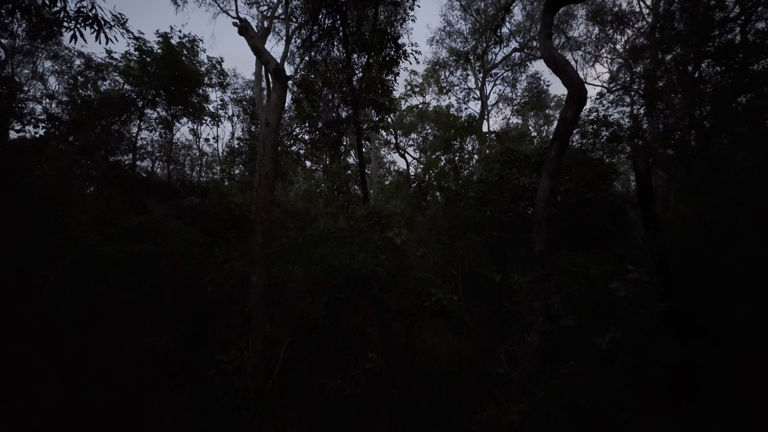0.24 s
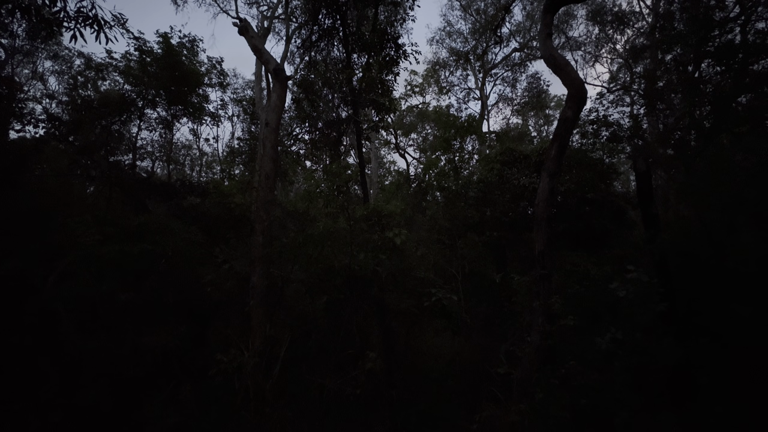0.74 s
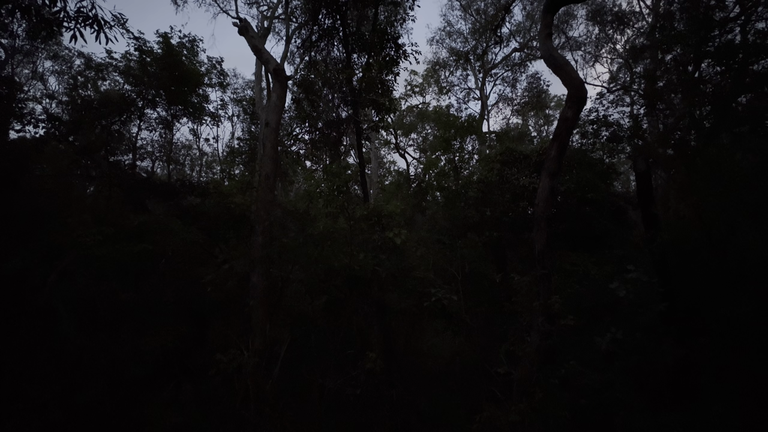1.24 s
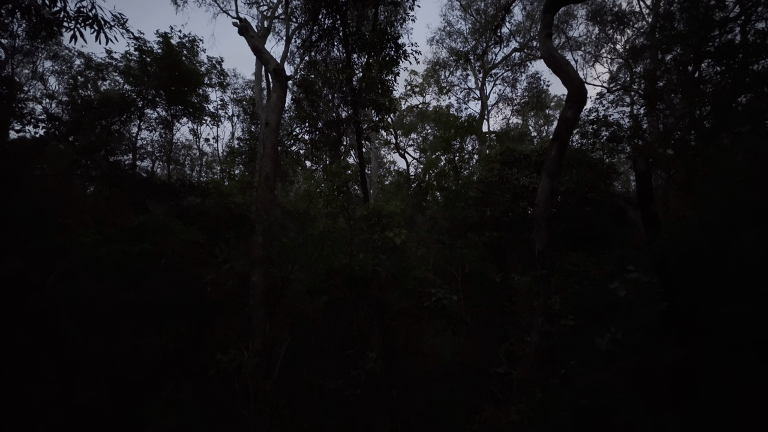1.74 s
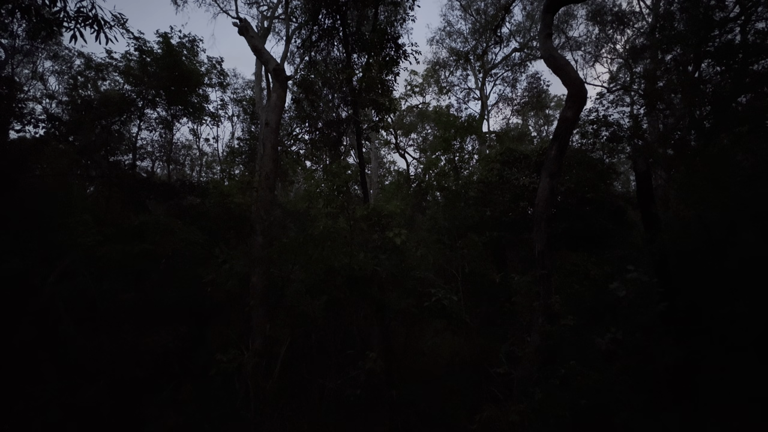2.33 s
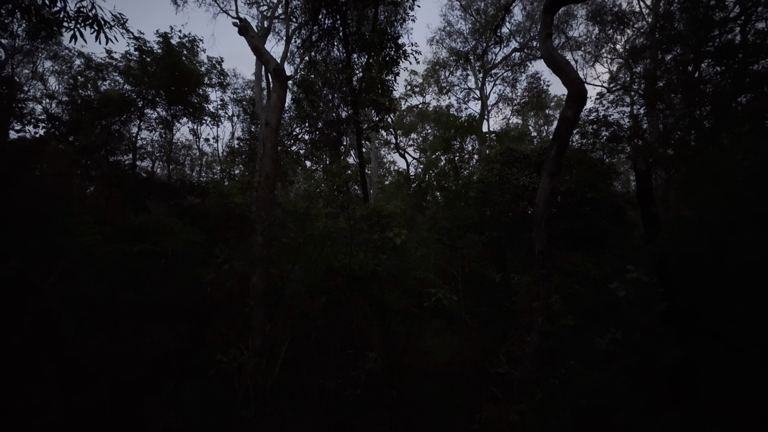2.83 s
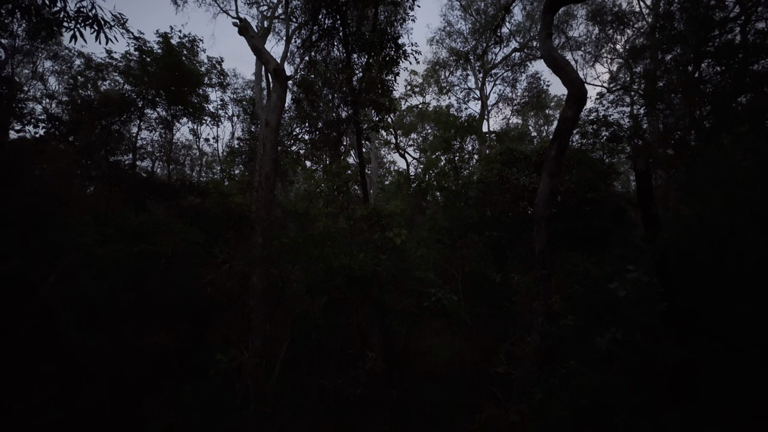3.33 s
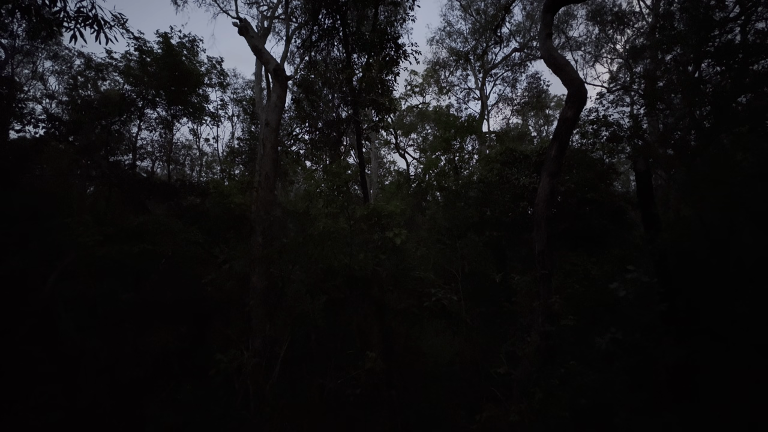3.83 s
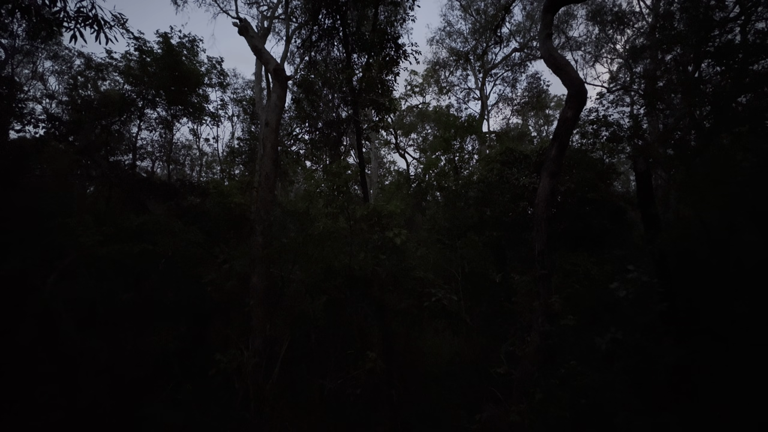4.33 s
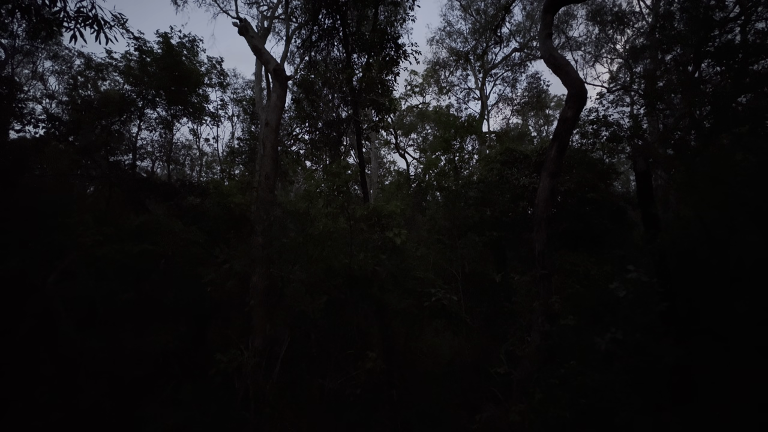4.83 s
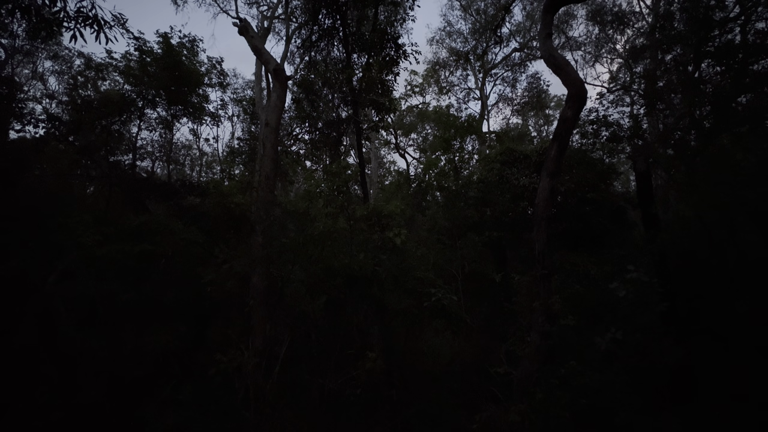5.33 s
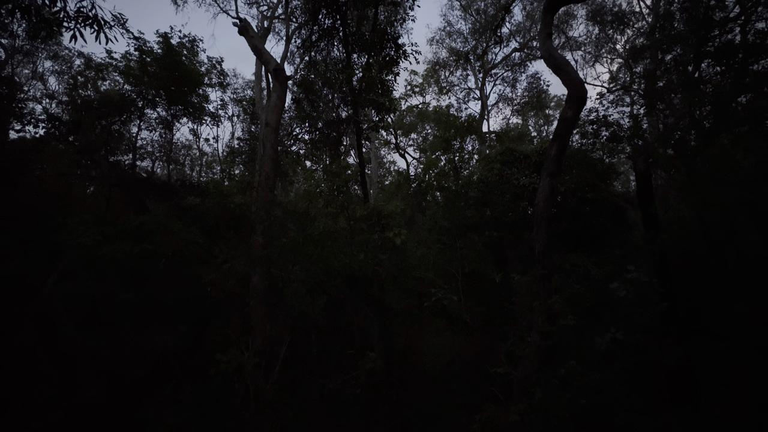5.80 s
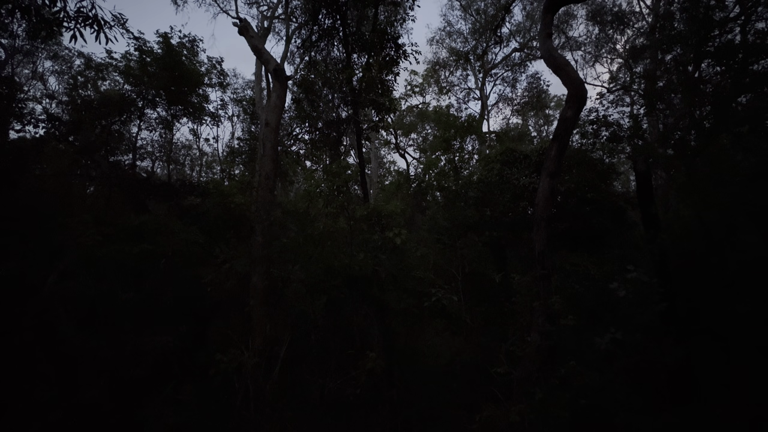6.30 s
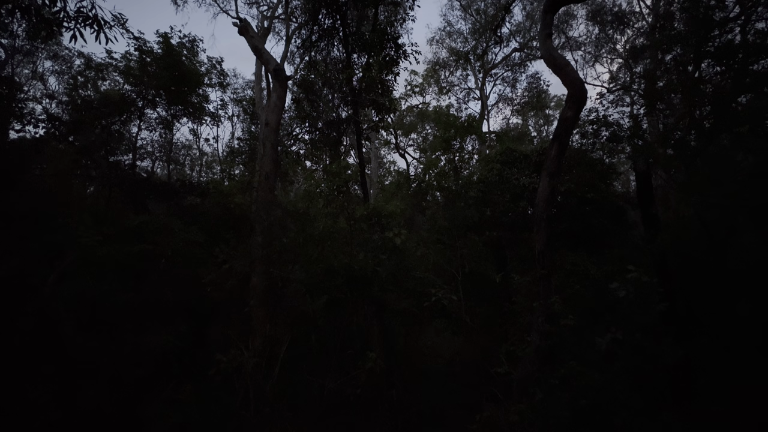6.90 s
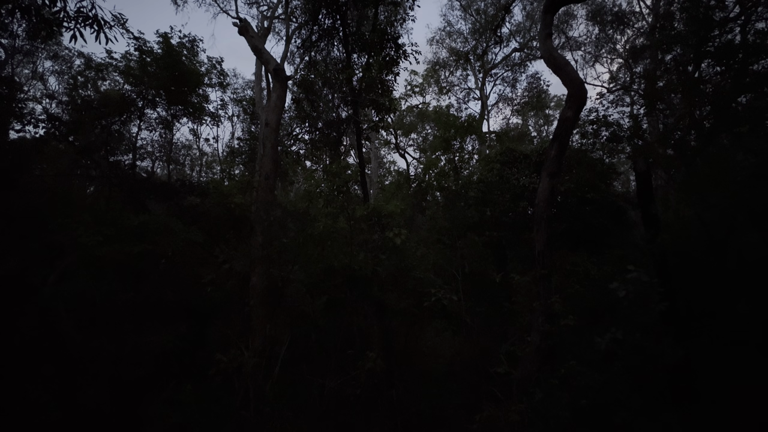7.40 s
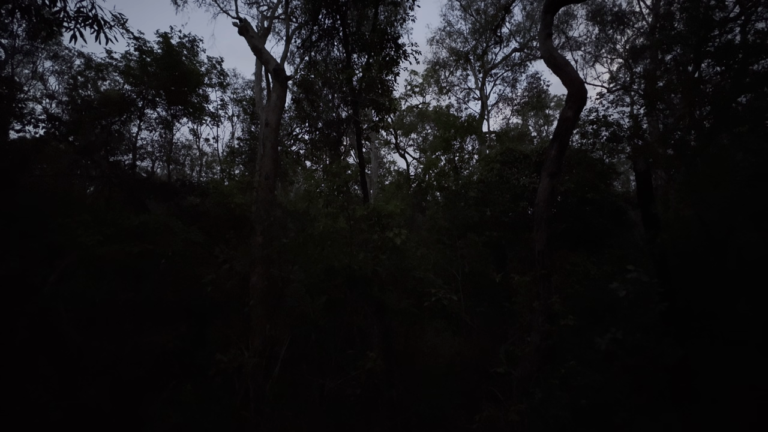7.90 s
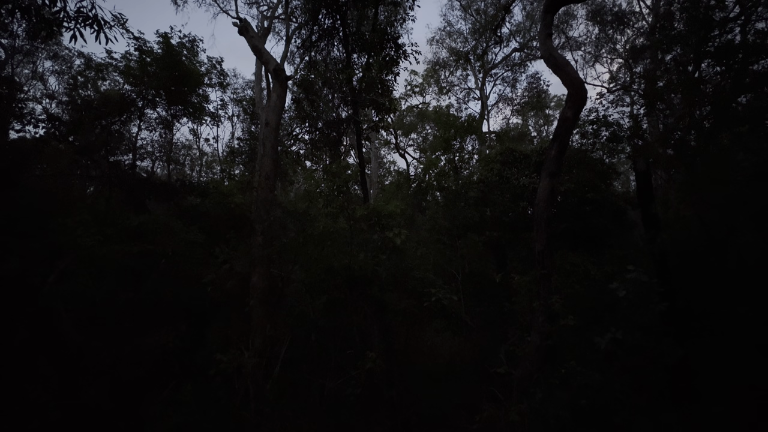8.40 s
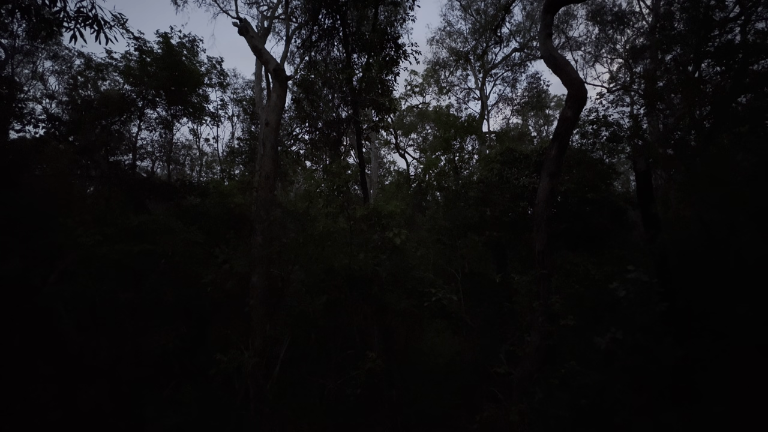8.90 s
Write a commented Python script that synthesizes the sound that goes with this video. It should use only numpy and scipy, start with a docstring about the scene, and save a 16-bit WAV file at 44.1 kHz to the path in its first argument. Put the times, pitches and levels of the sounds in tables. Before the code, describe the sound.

Shrill cicadas fill the woods, a lower one buzzing in quick pulses, with far bird chatter early and four clear crow caws near the end.

```python
"""Forest at dusk

A dense cicada chorus (random short-time spectra) drones to the left under a faint fizz; a lower cicada
(puffed noise through body resonances, with thin wavering tones) buzzes in short phrases. A crow calls, hoarse
at first (puffed noise), then in four clear caws (harmonic partials through a throat). Far birds hoot and yelp
(arched tones) over a faint murmur and rumble (noise). Two spaced ports hear each direction with its own phase."""
import sys
import numpy as np
from scipy import signal
from scipy.fft import rfft, irfft, next_fast_len
from scipy.io import wavfile
from scipy.ndimage import uniform_filter1d

SR = 44100
rng = np.random.default_rng(int(sys.argv[2]) if len(sys.argv) > 2 else 0)


def generate_wav(signal):
    """Clip the signal to [-1, 1] and save it as 16-bit WAV at the path in sys.argv[1]."""
    frames = np.transpose(np.atleast_2d(signal))
    scaled = np.clip(frames, -1, 1) * 32767
    pcm = np.round(scaled).astype(np.int16)
    wavfile.write(sys.argv[1], SR, pcm)


N = 403515

# Every port table says how the right port hears a direction:
# (frequency [Hz], likeness to the left [0-1], phase [rad], left over right [dB]).
# Direction of the buzzing cicada, shared by its buzz and its thin tones; columns as above
BUZZ_PORTS = [(2460, 0.84, -0.8, 4), (3198, 0.83, -3, 1.9), (4270, 0.48, -6, 2.6)]


def chorus():
    """Superposition: countless unrelated singers add up to noise, coloured by their mean spectrum."""
    # mean spectrum of the chorus: (frequency [Hz], relative level [dB])
    chorus_spectrum = [(3800, -15), (4200, -9.5), (4700, -6), (5300, -8), (5950, -6), (6250, -0.5),
                       (6450, 0.5), (6750, -4), (7100, -11.5), (7700, -15), (8300, -17.5), (8800, -23),
                       (9300, -30.5), (9700, -47)]
    # louder single singers and thin spots: (frequency [Hz], width [Hz], level against the chorus [dB])
    singers = [(4090, 120, -4), (4775, 50, 5), (4910, 60, 2.5), (5165, 60, 2.5), (5408, 90, 2.5),
               (5860, 50, 5), (5980, 110, -3.5), (6460, 60, 3), (6920, 60, 3)]
    # direction of the chorus, columns as in every port table
    chorus_ports = [(3660, 0.071, 0, 1.5), (4980, 0.026, 0, 9), (6000, 0.066, 0, 9), (7200, 0.057, 0, 9),
                    (9140, 0.046, 0, 0), (9950, 0.43, 0, -9)]
    arrivals = drone(chorus_spectrum, -32.5, patchy_db=0.0, flicker_db=1.01, peaks=singers)
    return ports(*arrivals, chorus_ports)


def fizz():
    """Superposition again: the faint top of the insects is flickering noise of high frequency."""
    # mean spectrum of the fizz: (frequency [Hz], relative level [dB])
    fizz_spectrum = [(8500, -13), (9600, -35), (10200, 2), (12000, -2.5), (14300, -3), (14800, -20.5),
                     (15200, -15), (16000, -19)]
    # direction of the fizz, columns as in every port table
    fizz_ports = [(8260, 0.43, 0.25, 0), (10260, 0.88, 4.1, 0), (10920, 0.93, 5.7, 0), (12570, 1, 9.3, 0),
                  (13960, .99, 12.2, 0), (16300, 0.97, 13.5, 0)]
    return ports(*drone(fizz_spectrum, -58.5, patchy_db=0.0, flicker_db=1.35), fizz_ports)


def buzzers():
    """Source and resonator: two tymbals buckle in turn, strong and weak, each a puff through the body."""
    # resonances of tymbal and belly: (frequency [Hz], half width at quarter power [Hz], level [dB])
    tymbal = [(2752, 63, -2.5), (2866, 22.5, 2.5), (2930, 47, 0), (3044, 74, 2.5), (3177, 134, 1.5),
              (3210, 104, -1.5), (3484, 96, 0), (3726, 59, 2.5), (3630, 104, 0), (3968, 28, 3)]
    # level of the buzz as it swells in: (time [s], level [dB])
    buzz_level = [(0, -49.5), (.3, -48), (.7, -45.5), (1.7, -44), (3, -44.5), (5, -44), (7, -44),
                  (9.15, -44)]
    puffs_per_s, puff_share = 231, .28  # rate [1/s], four-sigma/2 puff length as a share of the gap
    uneven, steady = .2, .68  # strong-weak step, noise that goes on between the puffs
    turns = np.cumsum(puffs_per_s * (1 + .009 * wander(size=9000) + .01 * wander(size=200))) / SR
    puff = np.exp(-.5 * ((turns % 1 - .5) / (puff_share / 2)) ** 2)
    puff *= 1 + uneven * (-1) ** np.floor(turns)
    drive = (steady + puff) * phrases() * rng.standard_normal(N)

    size = next_fast_len(N)
    hz = np.fft.rfftfreq(size, 1 / SR)
    body = np.sqrt(sum(amp(db) ** 2 / (1 + (hz - f) ** 2 / w ** 2) ** 2 for f, w, db in tymbal))
    body /= 1 + (np.abs(hz - 3350) / 900) ** 8  # the body passes only a band about 3350 Hz
    buzz = curve(buzz_level) * evened(irfft(rfft(drive, size) * body, size)[:N])
    return ports(*among_trees(buzz, t60=.15, wet=.25), BUZZ_PORTS)


def thin_tones():
    """Narrow-band noise: a carrier times a slow complex envelope wavers in pitch and strength."""
    # tones inside the buzz: (frequency [Hz], nominal width [Hz], level against the tone level [dB])
    tones = [(2655, 10, -10), (2860, 10, 1), (3020, 12, -9), (3440, 11, -2), (3652, 9.3, 2.5),
             (3970, 12, 0.5)]
    # common level before the phrase gain: (time [s], level [dB])
    tone_level = [(0, -73), (.7, -61), (3.2, -57.5), (4.3, -51.5), (5.5, -52.5), (7, -57), (9.15, -58.5)]
    t, out = np.arange(N) / SR, np.zeros(N)
    for hz, width_hz, db in tones:
        size = int(SR / (2 * width_hz))
        envelope = wander(size) + 1j * wander(size)
        carrier = np.exp(2j * np.pi * hz * t)
        out += amp(db + 2.2 * wander(size=25000)) * (envelope * carrier).real
    out *= curve(tone_level) * phrases()
    return ports(out, out[::-1], BUZZ_PORTS)  # time-reversed, the tones serve as the unrelated arrival


def phrases():
    """Amplitude modulation: each phrase swells 1.2 dB; its joins bump slightly at first, later break off."""
    # running count of the joins between phrases: (time [s], count)
    joins = [(-.07, 0), (1.516, 12), (2.838, 22), (3.246, 25), (3.791, 29), (4.325, 33), (4.88, 37),
             (5.713, 43), (6.283, 47), (7.147, 53), (7.696, 57), (8.241, 61), (9.226, 68)]
    # gain at the middle of a join: (time [s], gain [dB])
    join_gain = [(0, -3), (2, -4), (3.9, -5), (4.4, -9), (6, -12), (7.3, -9), (9.15, -10)]
    join_s, swell_db = .016, 1.2  # two sigma of a join [s], rise over a phrase [dB]
    t = np.arange(N) / SR
    count = np.interp(t, *np.transpose(joins))
    off_s = (count - np.round(count)) / np.gradient(count * SR)  # time from the nearest join
    join = np.exp(-.5 * (2 * off_s / join_s) ** 2)
    phrase_db = swell_db * (count % 1 - 4.0)  # from -4.8 to -3.6 dB
    return amp(np.interp(t, *np.transpose(join_gain)) * join + phrase_db * (1 - join))


def crow():
    """Source and filter: caws are harmonics through the throat, rasps noise puffed at an unsteady rate."""
    # throat and beak: (frequency [Hz], level [dB])
    throat = [(600, -36), (800, -17.5), (880, -11.5), (980, -4.5), (1130, 0), (1280, -0.5), (1400, -2),
              (1550, -5.5), (1770, 2), (2000, -3.5), (2180, -3), (2400, 3), (2550, -10), (2700, -22),
              (3500, -45)]
    # colour of the rasp: (frequency [Hz], level [dB])
    hoarse = [(600, -27), (850, -8), (1000, -3.5), (1150, 2), (1300, 2.5), (1500, 1.5), (1750, 3.5),
              (1900, -6), (2100, -27), (2400, -8), (2800, -21), (4000, -74)]
    # pitch of each clear caw, one list a caw: (time [s], pitch [Hz])
    caw_pitch = [
        [(5.6, 233.5), (5.65, 242), (5.745, 257.8), (5.84, 255.2), (5.9, 249.5), (5.95, 244), (6.0, 244.7),
         (6.098, 219.8), (6.17, 209.6)],
        [(6.52, 223.7), (6.594, 233.4), (6.674, 232.5), (6.76, 236), (6.84, 237.5), (6.93, 243), (6.968, 225.1),
         (7.14, 220.7), (7.21, 200)],
        [(7.56, 216.3), (7.62, 224.3), (7.70, 229.5), (7.78, 238), (7.84, 238), (7.875, 227.8), (7.94, 222),
         (8.0, 230.3), (8.064, 220.7), (8.12, 210), (8.19, 192.3)],
        [(8.55, 193.2), (8.604, 201.5), (8.636, 215.5), (8.668, 211), (8.694, 224.5), (8.756, 227),
         (8.87, 216.6), (8.96, 220.5), (9.01, 213), (9.2, 209)],
    ]
    # top level of each clear caw: [dB]
    caw_db = [-46, -45.5, -45.5, -45.5]
    # spectral tilt of each clear caw: (at its start [dB per partial], at its end [dB per partial])
    caw_tilt = [(-.2, -0.59), (-.1, -0.013), (0.1, -.4), (-0.36, -0.13)]
    # hoarse, pitchless calls: (start [s], end [s], top level [dB])
    rasps = [(-.2, 0.512, -60), (0.44, 1.048, -58.5), (1.097, 1.757, -66), (1.722, 2.85, -57),
             (3.21, 3.974, -59), (4.258, 5.097, -55)]
    # direction of the crow, columns as in every port table
    crow_ports = [(600, .7, -2.3, 3), (1100, .75, -2, 4), (1500, .74, -2.3, 3), (1750, .88, -2.4, 0),
                  (1950, .95, -2.9, -1), (2400, .95, -3.15, 0)]
    open_s, open_db, top_share, sag_db, shut_s = 0.054, -6.5, 0.64, -5, 0.045  # shape of a caw
    rasp_start_db, rasp_top_share, rasp_sag_db, rasp_edge_s = -8, 0.44, 0, 0.048  # shape of a rasp
    # a caw begins as a rasp, which drops back once the voice catches; levels against the caw's top
    lead_s, catch_s, lead_db, under_db = 0.17, 0.036, -11, -23.5

    t, out = np.arange(N) / SR, np.zeros(N)
    rasp = amp(-67.5 + 3 * wander(size=3000))  # wavering floor
    for rows, top_db, tilt_db in zip(caw_pitch, caw_db, caw_tilt):
        s, hz = np.transpose(rows)
        part = slice(int(s[0] * SR), min(int(s[-1] * SR), N))
        size = part.stop - part.start
        jitter = 0.0062 * wander(size=180, count=size) + 0.00503 * wander(size=900, count=size)
        pitch = uniform_filter1d(np.interp(t[part], s, hz), size=500) * (1 + jitter)
        turns = np.cumsum(pitch) / SR
        tilt = np.linspace(*tilt_db, size)
        folds = np.zeros(size)
        for k in range(3, 14):
            # each partial flutters on its own through the moving air and leaves
            partial_db = 1.3 * wander(size=1100, count=size) + (k - 7) * tilt
            folds += amp(partial_db) * np.cos(2 * np.pi * k * turns)
        level = amp(top_db) * swell(s[0], s[-1], open_db, top_share, sag_db, open_s, shut_s)
        out[part] += evened(coloured(folds, throat)) * level[part]
        lead = amp(top_db + lead_db) * swell(s[0] - lead_s, s[0] + 2 * catch_s, rasp_start_db,
                                             rasp_top_share, 0, rasp_edge_s, catch_s)
        rasp = np.hypot(rasp, np.hypot(lead, amp(under_db) * level))  # powers add
    for start, end, db in rasps:
        call = swell(start, end, rasp_start_db, rasp_top_share, rasp_sag_db, rasp_edge_s, rasp_edge_s)
        rasp = np.hypot(rasp, amp(db) * call)

    turns = np.cumsum(90 * (1 + 0.29 * wander(size=1500))) / SR  # about 90 puffs a second
    puffs = (2.0 + np.exp(-(turns % 1) / 0.11)) * rng.standard_normal(N)
    out += rasp * evened(coloured(puffs, hoarse))
    return ports(*among_trees(out, t60=.35, wet=.3), crow_ports)


def swell(start, end, start_db, top_share, sag_db, rise_s, fall_s):
    """Envelope of one call: it opens, swells to 0 dB, sags and shuts."""
    t = np.arange(N) / SR
    body_db = np.interp(t, [start, start + top_share * (end - start), end], [start_db, 0, sag_db])
    return amp(body_db) * np.clip((t - start) / rise_s, 0, 1) * np.clip((end - t) / fall_s, 0, 1)


def cackle():
    """Multiple scattering: far hoots, yelps and chatter are blurred by echoes among the trees."""
    # low hoots: (middle [s], level [dB], pitch [Hz])
    low_hoots = [(0.064, -60, 696), (0.246, -67, 674), (0.348, -66, 699), (0.55, -73, 584),
                 (0.714, -68, 690), (0.854, -64, 668), (0.974, -63, 660), (1.098, -59.5, 690),
                 (1.242, -64, 692), (1.384, -66, 690), (1.51, -63, 720), (1.658, -66, 706),
                 (2.154, -68, 641), (2.24, -65, 656), (2.32, -62, 655), (2.674, -71, 533), (3.17, -70, 646),
                 (3.29, -66, 650), (3.456, -61, 650), (3.606, -63, 687), (3.724, -61.5, 688),
                 (4.05, -72, 580), (4.154, -68, 630), (4.268, -71, 560), (4.354, -66, 663),
                 (4.54, -65, 700), (5.36, -66, 615), (5.474, -62, 628), (5.584, -61, 618),
                 (5.682, -65, 582), (5.81, -63, 583), (6.79, -69, 673), (6.93, -68, 650), (6.964, -68, 594),
                 (7.04, -66, 580), (7.14, -65, 609), (7.77, -75, 518), (8.05, -71, 607), (8.158, -69, 610),
                 (8.264, -69, 614), (8.378, -66.5, 605), (8.488, -67, 582), (8.594, -65, 582),
                 (8.72, -70, 542), (8.98, -78, 667)]
    # notes that stand out: (middle [s], level [dB], pitch [Hz], length [s], droop [share of pitch])
    clear_yelps = [(.074, -53.5, 1217, 0.08, 0.07), (.21, -54.5, 1164, .11, 0.017),
                   (.378, -62, 1244, 0.095, .02), (.56, -54, 1175, 0.1, 0.065),
                   (.726, -55, 1475, 0.08, 0.025), (.83, -64, 1110, 0.074, .01),
                   (1.008, -58, 1340, 0.1, 0.074), (1.114, -52, 1410, .06, .02),
                   (1.255, -60.5, 1197, 0.14, .13), (1.39, -68, 1115, 0.071, .02),
                   (1.514, -62, 1470, .1, 0.0098), (1.65, -56.5, 1486, .09, 0.075),
                   (1.84, -60, 1140, 0.08, .05), (2.02, -57.5, 702, 0.18, .12),
                   (2.164, -60, 1222, 0.08, 0.036), (2.69, -57, 1147, .09, 0.054),
                   (2.814, -63, 1136, 0.084, .02), (3.03, -57, 1147, 0.088, 0.072),
                   (3.36, -60, 1145, .5, 0.015), (3.545, -55.5, 1100, 0.087, 0.11),
                   (3.74, -55, 1022, 0.08, 0.022), (3.876, -57.5, 1130, 0.076, 0.036),
                   (4.26, -58.5, 1125, 0.12, 0.014), (4.43, -64, 1160, 0.059, .02),
                   (4.82, -57, 1110, .08, 0.023), (4.96, -59, 1090, 0.084, 0.022),
                   (5.03, -58.5, 1225, 0.17, 0.018), (5.15, -63, 1120, 0.074, .03),
                   (6.225, -61, 922, 0.065, .05), (6.46, -71, 1170, .1, .01),
                   (6.71, -62.5, 694, 0.096, 0.13), (8.95, -60, 880, 0.061, .03)]
    # faint random notes, a high and a low voice:
    # (rate [1/s], mean level [dB], lowest pitch [Hz], highest pitch [Hz], last start [s])
    voices = [(14, -65, 950, 1800, 5.3), (12, -74, 540, 720, 9.1)]
    # direction of the far birds, columns as in every port table
    cackle_ports = [(500, .62, -2.2, 3), (1100, .72, -3, 2), (1900, .6, -4, 1)]
    # every hoot lasts .07 s and droops by .1
    hoots = notes([(*row, .07, .1) for row in low_hoots], overtone_db=-10, husk=.6)
    yelp_rows = [*clear_yelps, *chatter(*voices[0]), *chatter(*voices[1])]
    yelps = notes(yelp_rows, overtone_db=-25, husk=.5)
    return ports(*among_trees(hoots + yelps, t60=.5, wet=.52), cackle_ports)


def notes(rows, overtone_db, husk):
    """Frequency modulation: short tones arch up and then fall, with one overtone and husky loudness."""
    out = np.zeros(N + SR)
    for s, db, hz, length, droop in rows:
        u = np.linspace(-1, 1, int(length * SR))
        phase = 2 * np.pi * np.cumsum(hz * (1 - droop * (u + 0.513) ** 2)) / SR  # highest at u = -0.513
        tone = np.sin(phase) + amp(overtone_db) * np.sin(2 * phase)
        at = max(int(s * SR) - len(u) // 2, 0)
        out[at:at + len(u)] += np.sqrt(2) * amp(db) * tone * np.hanning(len(u)) ** 0.81
    return out[:N] * (1 + husk * wander(size=120))


def chatter(per_s, db, low_hz, high_hz, end_s):
    """Random point process: rows of faint notes at chance times, with pitches spread evenly in octaves."""
    when, size, pitch, length, fall = rng.random((int(per_s * end_s), 5)).T
    level_db = db + 3 * (2 * size - 1)
    hz = low_hz * (high_hz / low_hz) ** pitch
    return np.transpose([when * end_s, level_db, hz, .05 + .07 * length, .08 * fall])


def air():
    """Ambient noise: a coloured forest murmur whose part below 130 Hz swells slowly as a rumble."""
    # spectrum of rumble and far murmur: (frequency [Hz], relative level [dB])
    murmur = [(15, -31), (40, -4.5), (65, 2.5), (110, -7), (200, -15), (370, -17), (550, -16.5), (780, -17),
              (1000, -2), (1200, -15), (1800, -3.5), (2100, -0.5), (2500, 4), (3000, 3), (4000, -6),
              (5000, -41)]
    # swell of the rumble: (time [s], relative level [dB])
    rumble = [(0, -73.5), (.85, -79.5), (1.4, -71.5), (1.81, -77), (2.04, -71), (2.6, -76), (3.15, -71),
              (3.85, -70.5), (4.46, -74), (5.3, -74), (6.9, -78), (9.15, -79)]
    # direction of the murmur, columns as in every port table
    air_ports = [(30, 1, 0.1, -4), (79.5, 0.91, 0.44, -1), (200, 0.44, 1, -0.5), (408, 0.12, -0.5, 1),
                 (567, 0.64, -1.5, 5), (1400, 0.96, -4, 1.5), (1840, 0.046, 5.5, 0.5),
                 (2880, 0.68, -1, 4.5)]
    both = np.array(drone(murmur, -55.5, patchy_db=1.1, flicker_db=.3))
    low = signal.sosfiltfilt(signal.butter(2, 130, fs=SR, output="sos"), both)
    return ports(*(both + low * (evened(curve(rumble)) - 1)), air_ports)


def drone(spectrum, db, patchy_db, flicker_db, peaks=()):
    """Random-phase synthesis: chance short-time spectra with drifting levels give two unrelated arrivals."""
    a, b, c, d, patches = rng.standard_normal((N // 256 + 5, 257, 5)).T  # each frequency by frame
    flicker = evened(uniform_filter1d(uniform_filter1d(patches, 12, 0), 4, 1))
    patches = evened(uniform_filter1d(uniform_filter1d(patches[::-1], 4, 0), 20, 1))
    z = np.array([a + 1j * b, c + 1j * d]) * amp(patchy_db * patches + flicker_db * flicker)
    window = np.sqrt(signal.windows.hann(512, sym=False))
    noise = signal.istft(z, window=window, nperseg=512, noverlap=256)[1][:, :N]
    # the spectrum falls away beyond both ends
    closed = [(spectrum[0][0] * .8, -70)] + list(spectrum) + [(spectrum[-1][0] * 1.1, -70)]
    return [amp(db) * evened(coloured(x, closed, peaks)) for x in noise]


def among_trees(x, t60, wet):
    """Reverberation: direct sound with decaying scattered echoes, and a second arrival of echoes alone."""
    t = np.arange(SR // 2) / SR
    tails = rng.standard_normal((2, len(t))) * amp(-60 * t / t60) * (t > .004)
    tails /= np.linalg.norm(tails, axis=1, keepdims=True)
    echo, other = signal.fftconvolve(x[None], tails, axes=1)[:, :N]
    wet = np.clip(wet, 0, 1)
    return np.sqrt(1 - wet ** 2) * x + wet * echo, other


def ports(left, other, table):
    """Coherence: the right port hears the left sound turned in phase, mixed with an unrelated arrival."""
    size = next_fast_len(N)
    same, phase, lean_db = read(table, np.fft.rfftfreq(size, 1 / SR))
    same = np.clip(same, 0, 1)
    right = same * np.exp(1j * phase) * rfft(left, size) + np.sqrt(1 - same ** 2) * rfft(other, size)
    return np.array([left, irfft(right / amp(lean_db), size)[:N]])


def coloured(x, points, peaks=()):
    """Linear filtering: weights the spectrum by a level curve, with optional narrow peaks on top."""
    size = next_fast_len(len(x))
    hz = np.fft.rfftfreq(size, 1 / SR)
    lift_db = sum(db / (1 + (2 * (hz - f) / w) ** 2) for f, w, db in peaks)
    return irfft(rfft(x, size) * amp(read(points, hz)[0] + lift_db), size)[:len(x)]


def wander(size, count=N):
    """Smoothed chance: noise averaged twice over size samples, of rms 1."""
    return evened(uniform_filter1d(uniform_filter1d(rng.standard_normal(count), size), size))


def read(points, hz):
    """Interpolation on a logarithmic frequency axis: columns of a table at the given frequencies."""
    f, *columns = np.transpose(points)
    return [np.interp(np.log(hz + 1), np.log(f + 1), c) for c in columns]


def curve(points):
    """Level over time, interpolated in dB, as a gain for every sample."""
    return amp(np.interp(np.arange(N) / SR, *np.transpose(points)))


def evened(x):
    """Power normalisation: scales to rms 1."""
    return x / np.sqrt(np.mean(x ** 2) + 1e-20)


def amp(db):
    """Decibel law: amplitude gain of a level in dB."""
    return 10 ** (np.asarray(db) / 20)


def scene():
    """Superposition of all sources at both ports."""
    return chorus() + fizz() + buzzers() + thin_tones() + crow() + cackle() + air()


def record(dry):
    """Band limit: a linear-phase low-pass filter with its edge at 15780 Hz."""
    lowpass = signal.firwin(511, 15780, window=("kaiser", 9), fs=SR)
    return signal.oaconvolve(dry, lowpass[None], "same")


dry = scene()
out = record(dry)
generate_wav(out)
```